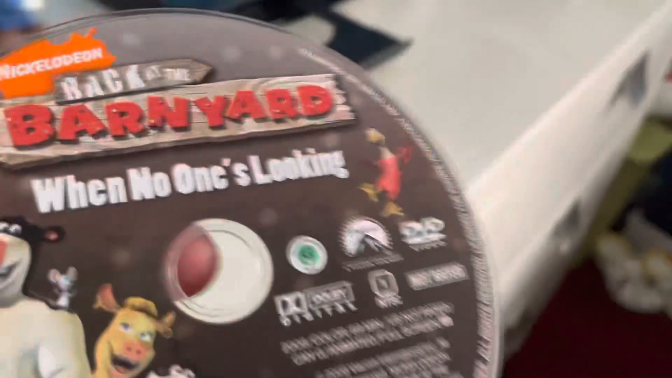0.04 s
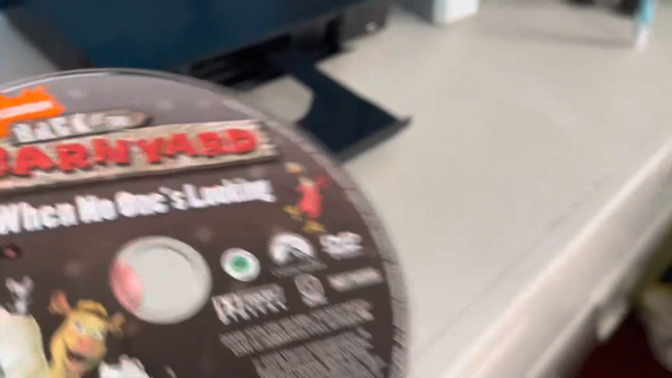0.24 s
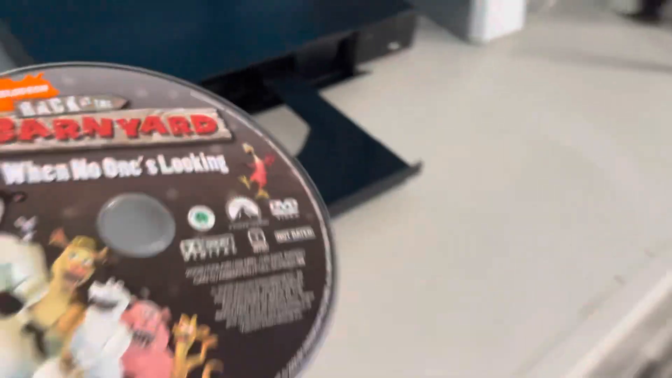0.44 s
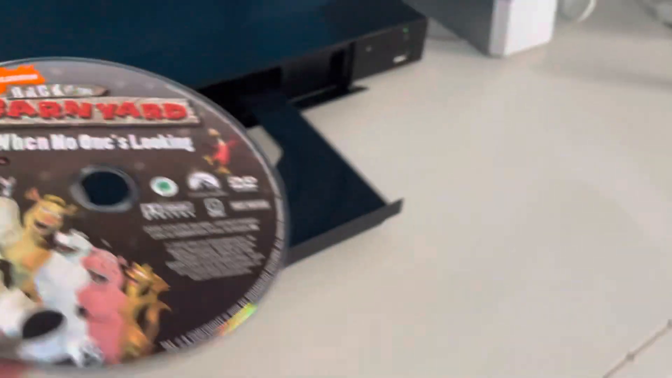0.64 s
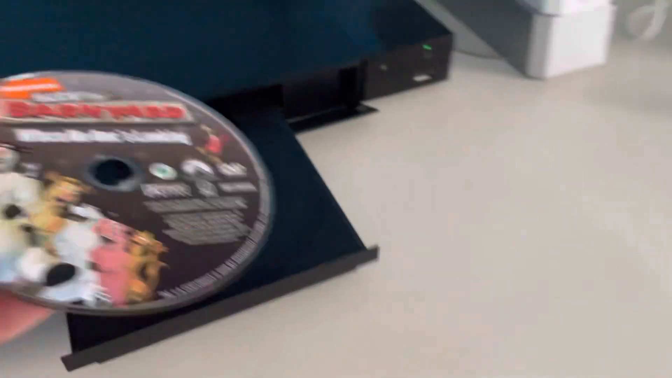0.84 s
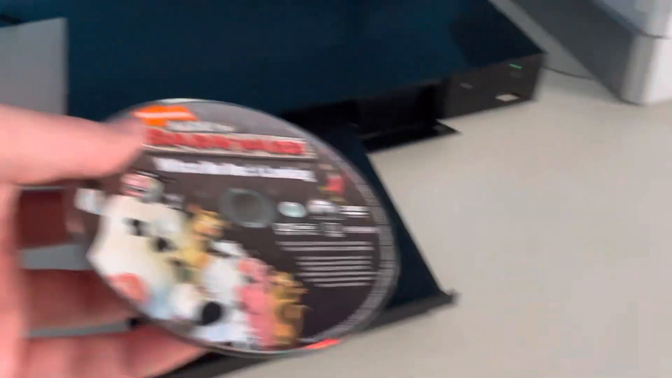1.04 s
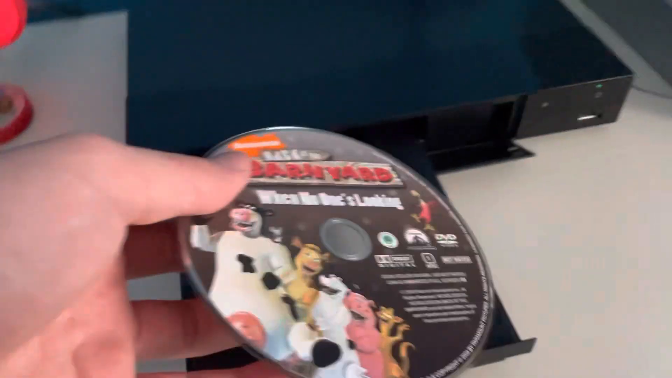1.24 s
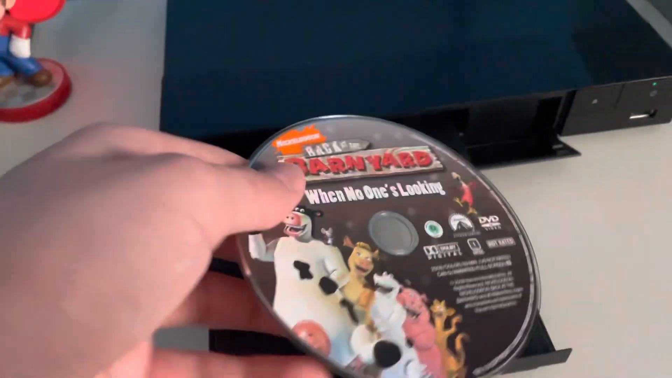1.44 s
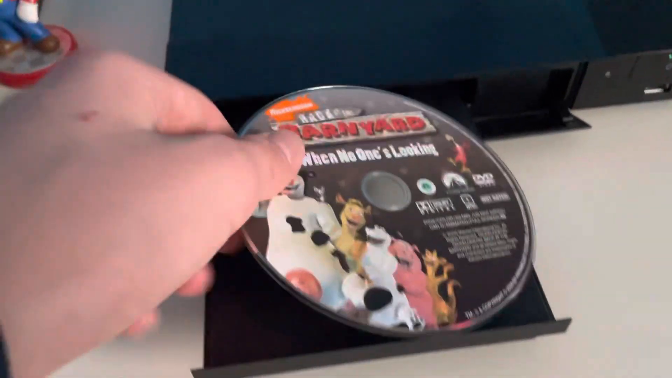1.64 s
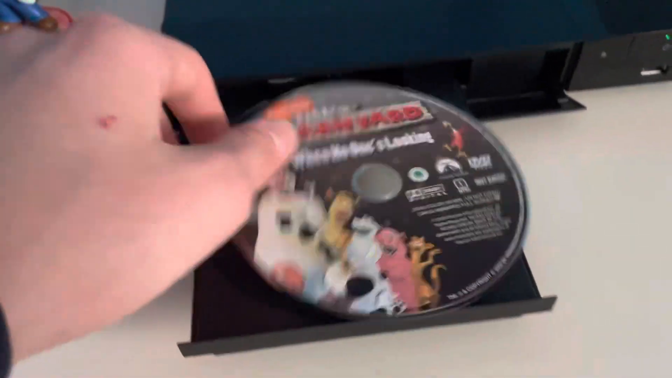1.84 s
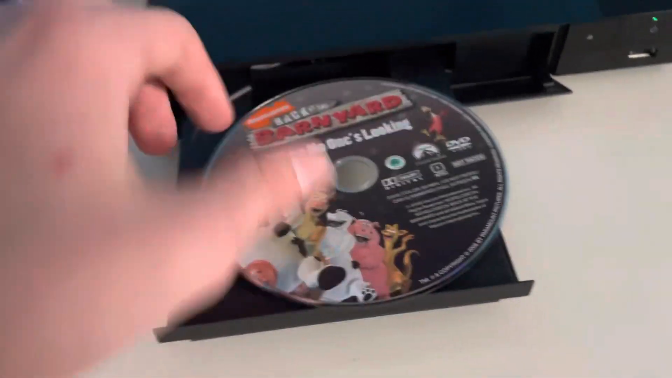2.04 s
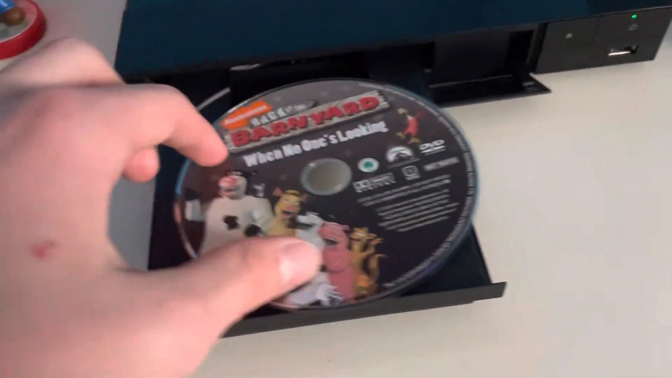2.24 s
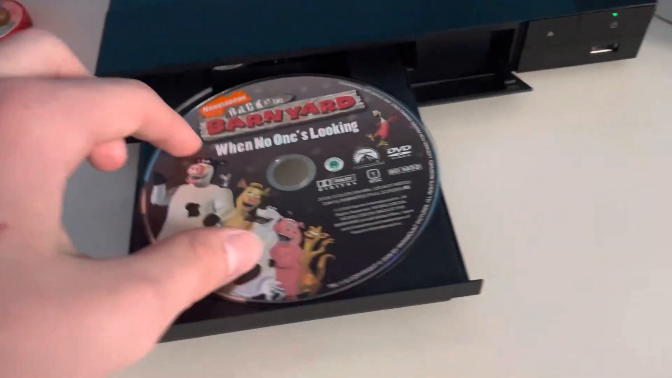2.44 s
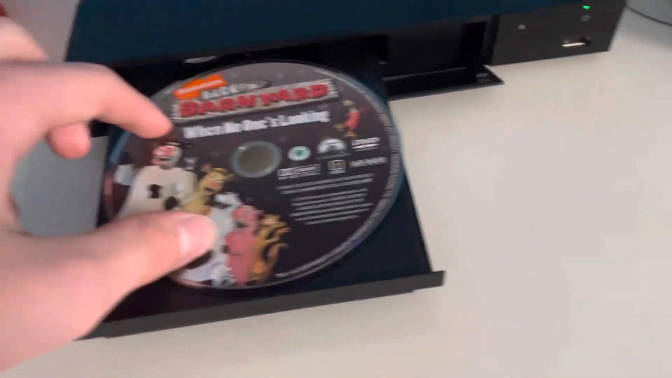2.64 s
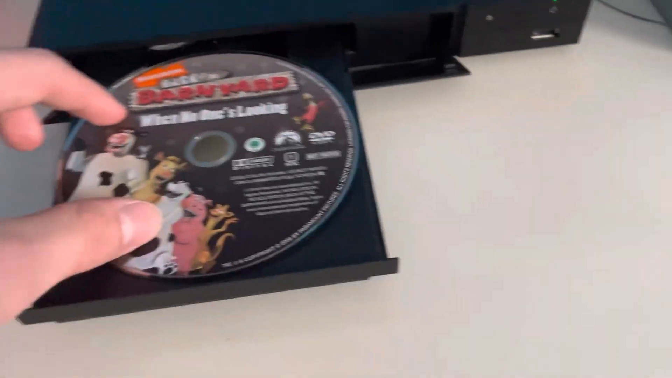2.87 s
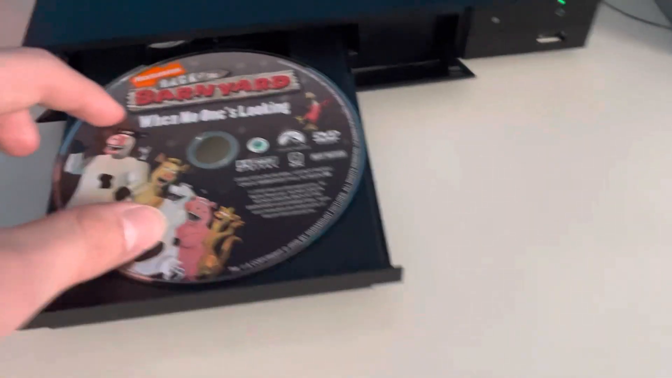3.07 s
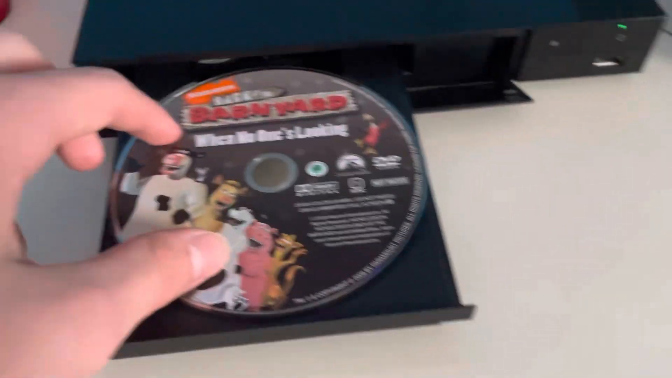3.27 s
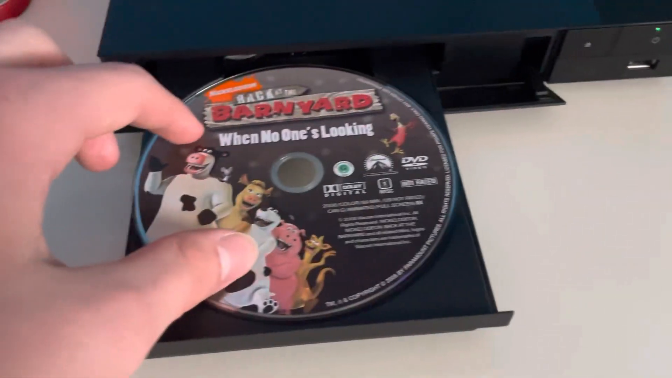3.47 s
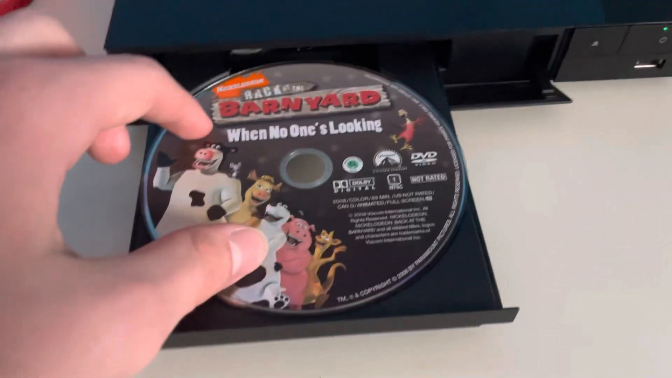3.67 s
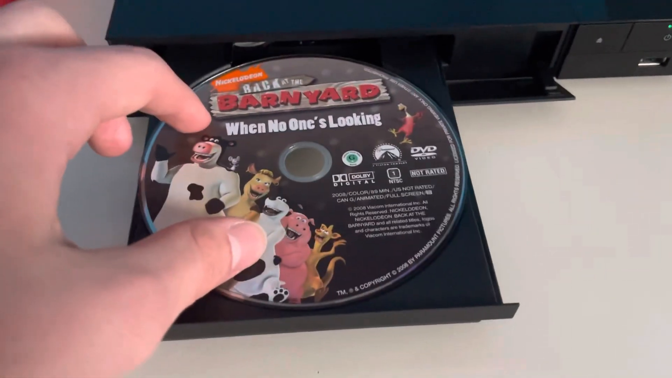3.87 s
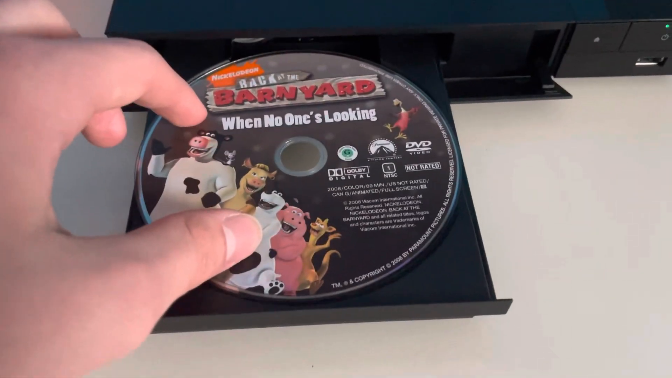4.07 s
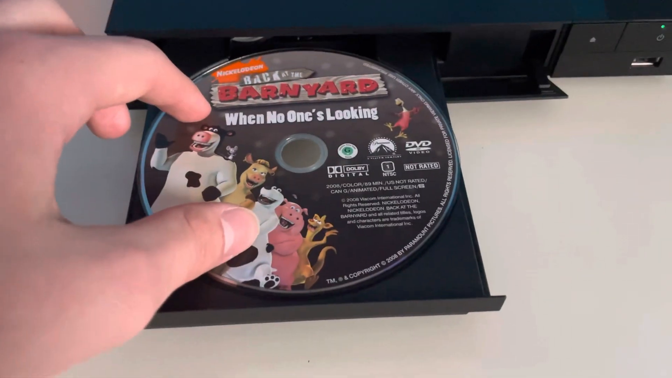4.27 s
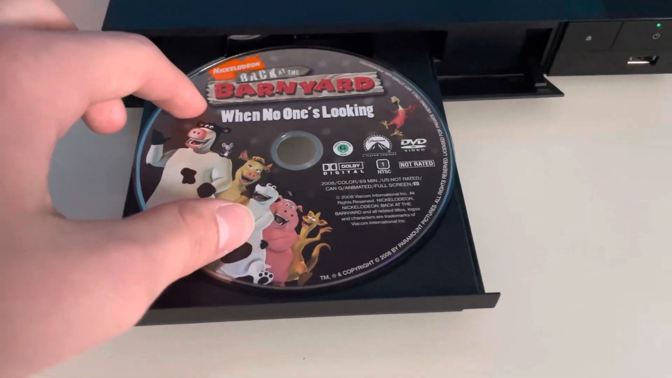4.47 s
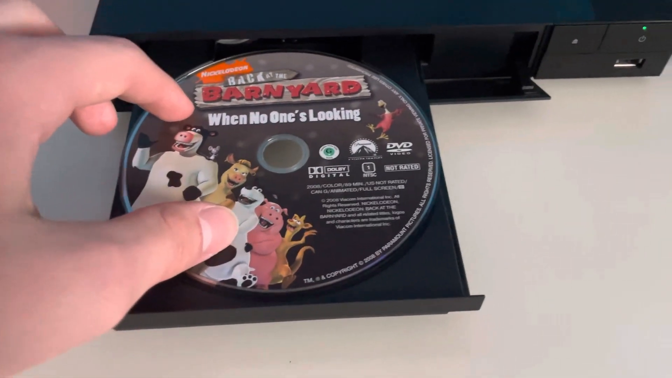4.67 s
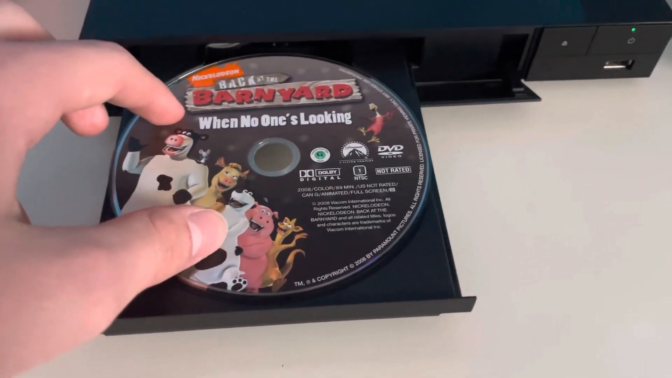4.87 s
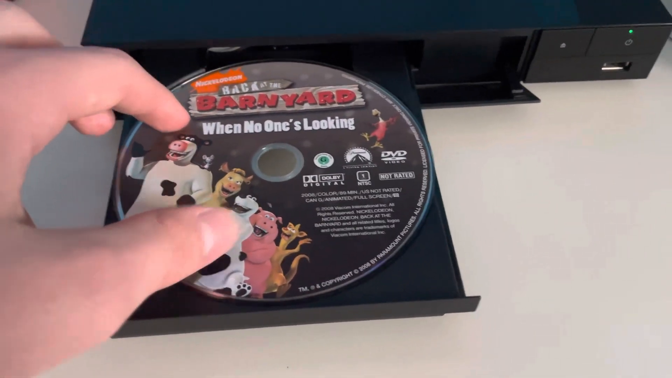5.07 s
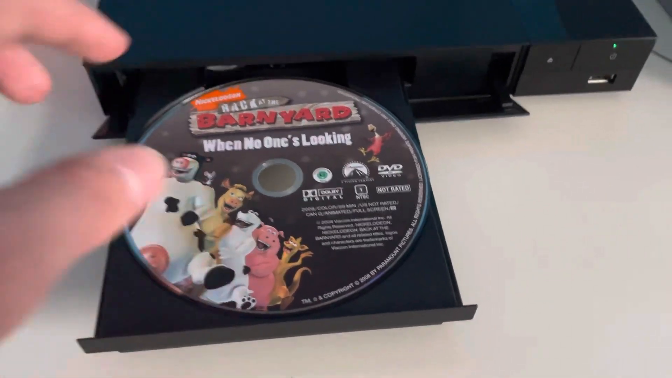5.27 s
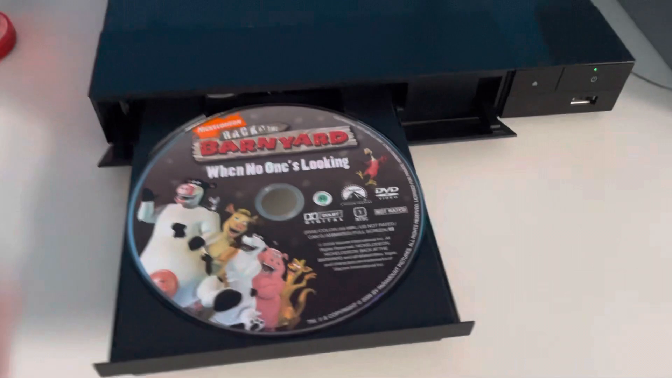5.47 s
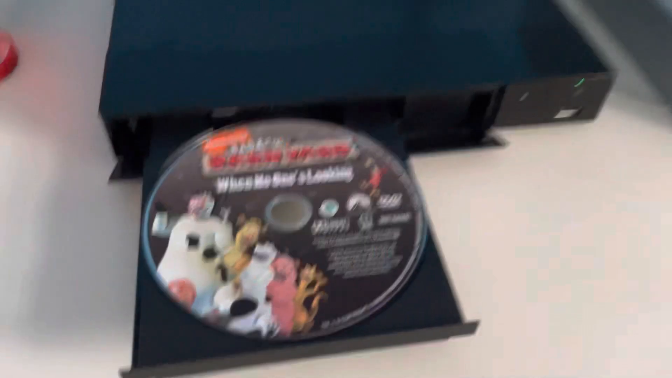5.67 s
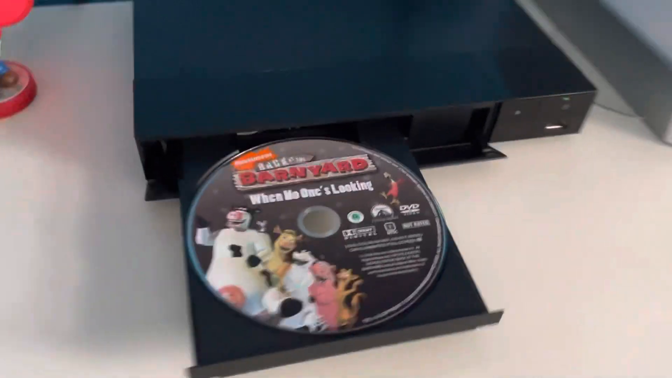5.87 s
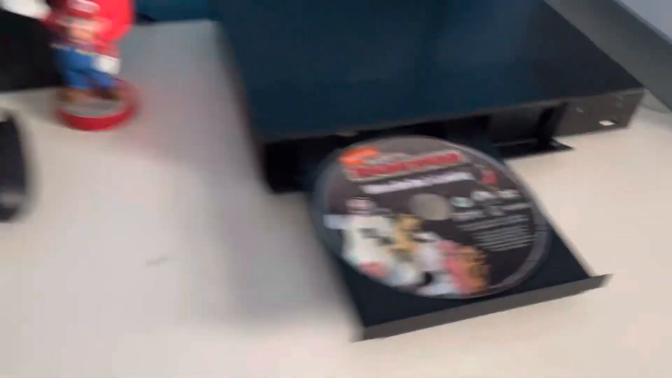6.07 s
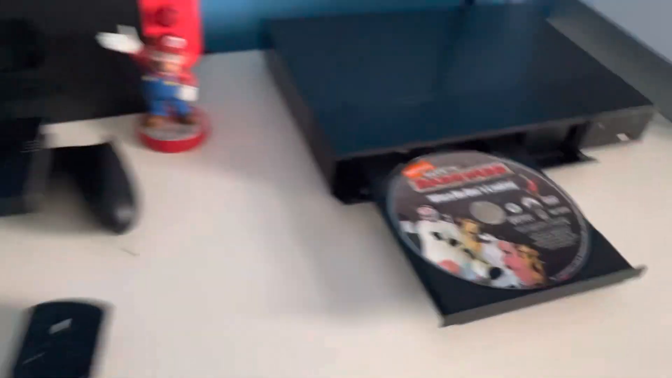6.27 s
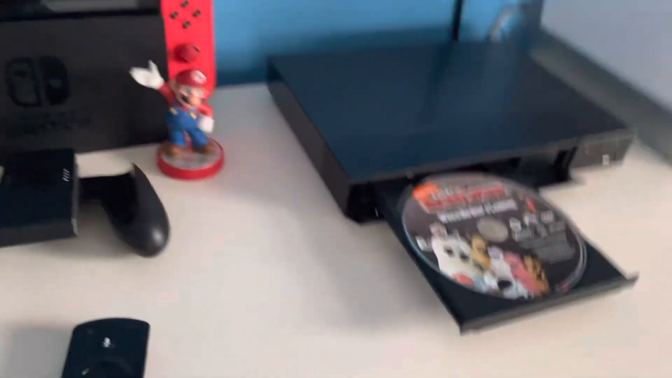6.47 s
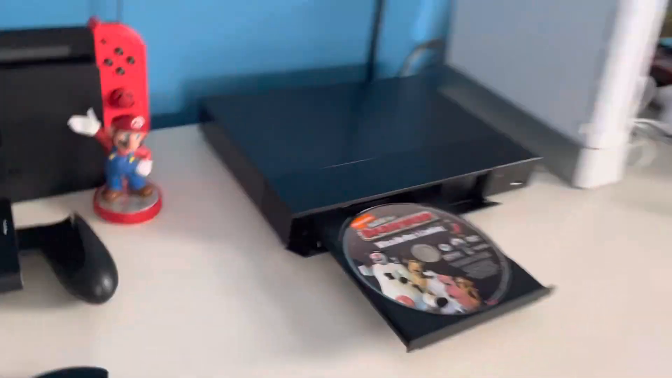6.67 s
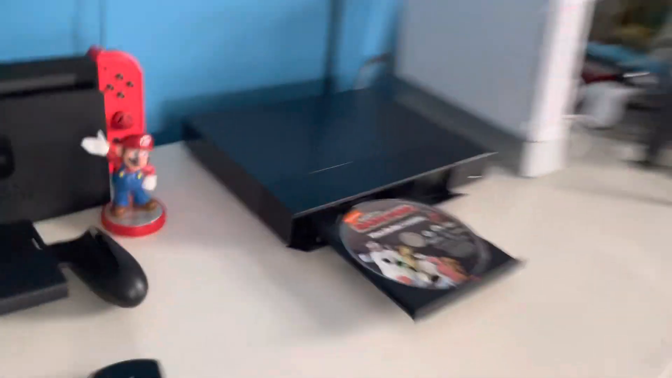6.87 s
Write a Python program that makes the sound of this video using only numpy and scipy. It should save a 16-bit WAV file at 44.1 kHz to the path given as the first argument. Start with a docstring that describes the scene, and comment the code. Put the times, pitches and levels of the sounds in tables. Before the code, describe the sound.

A hand-held stereo microphone listens up close in a quiet room with a steady low rumble. For the first second there are soft, dull knocks of hand and furniture and a faint sleeve rustle. From about 1.2 seconds a plastic disc taps and scrapes lightly against a player's open tray. At 1.8 seconds it drops in with a quick, bright rattle, the loudest event, which dies away just after 2 seconds. A sharp click follows at about 2.4 seconds, then faint scuffs, ticks and tiny plastic creaks until 3 seconds as fingers nudge it into its seat. It is then almost still, with one faint tap near 4.2 seconds and a few more around 5 as the fingers let go. From 5.5 seconds a body shifts, cloth rustles and soft knocks come as the microphone swings away, ending with a low, dull thump at 6.8 seconds.

```python
"""Laying a disc in a player's tray

A plastic disc taps and scrapes an open tray, drops with a rattle and is nudged into its seat. Impact and
friction excite its modes, which differ as it is held, lies loose or is pressed. Hand and furniture knock,
a sleeve rustles and a body shifts over the low rumble of a quiet room. A hand-held stereo microphone
hears it all and swings away near the end."""
import sys
import numpy as np
from scipy import signal
from scipy.fft import rfft, irfft, next_fast_len
from scipy.io import wavfile

SR = 44100
rng = np.random.default_rng(int(sys.argv[2]) if len(sys.argv) > 2 else 0)


def wrap_up_sound(samples):
    """Save the sound to the file named by the first command line argument, as 16-bit audio."""
    columns = np.atleast_2d(samples).T
    # keep every value between -1 and 1, then stretch to whole-number steps
    tamed = np.clip(columns, -1, 1)
    steps = np.round(tamed * 32767).astype(np.int16)
    wavfile.write(sys.argv[1], SR, steps)


N = 305076


def from_db(db):
    """Amplitude ratio of a level in decibels."""
    return 10 ** (np.asarray(db) / 20)


def rms_one(x):
    """Normalisation to unit rms."""
    return x / np.sqrt(np.mean(x ** 2) + 1e-20)


def at_hz(points, size, log=True):
    """Interpolation of a (frequency, value) table onto an FFT grid."""
    hz = np.arange(size // 2 + 1) * SR / size
    knots, values = np.transpose(points)
    return np.interp(np.log(hz + 1), np.log(knots + 1), values) if log else np.interp(hz, knots, values)


def coloured(x, spectrum):
    """Spectral shaping, at unit rms."""
    return rms_one(irfft(rfft(x) * from_db(at_hz(spectrum, N)), N))


def band(x, low_hz, high_hz):
    """Causal Butterworth band-pass."""
    return signal.sosfilt(signal.butter(2, [low_hz, high_hz], "band", fs=SR, output="sos"), x + 1e-18)


def steep_band(x, low_hz, high_hz):
    """Two band-passes in cascade double the slopes."""
    return band(band(x, low_hz, high_hz), low_hz, high_hz)


def drift(rate_hz):
    """Slow random fluctuation: low-passed noise of unit rms."""
    pole = np.exp(-80 * np.pi * rate_hz / SR)
    slow = signal.lfilter([1], [1, -2 * pole, pole * pole], rng.standard_normal(N // 40 + 2002))[2000:]
    return np.interp(np.arange(N) / 40, np.arange(len(slow)), rms_one(slow))


def resonate(x, hz, width_hz):
    """A damped two-pole resonator with unit peak gain."""
    r = np.exp(-np.pi * width_hz / SR)
    feedback = [1, -2 * r * np.cos(2 * np.pi * hz / SR), r * r]
    return signal.lfilter([(1 - r * r) / 2, 0, (r * r - 1) / 2], feedback, x + 1e-18)


def grains(per_s, spread_db):
    """Stick-slip friction as a Poisson train of uneven impulses, at unit rms."""
    sizes = from_db(spread_db * np.minimum(rng.exponential(1, N), 5)) * rng.choice([-1, 1], N)
    return rms_one(sizes * (rng.random(N) < per_s / SR))


def envelope(times, levels_db, t60s, rises, holds=0.):
    """Events rise, hold and decay exponentially; being incoherent, they add in power."""
    power, t = np.zeros(N + SR), np.arange(SR) / SR
    for start, db, t60, rise, hold in np.broadcast(times, levels_db, t60s, rises, holds):
        i, size = round(start * SR), int(min(rise + hold + 1.5 * t60, 1) * SR)
        fall_db = 60 * np.maximum(t[:size] - rise - hold, 0) / t60
        power[i:i + size] += (from_db(db - fall_db) * np.minimum(t[:size] / rise, 1)) ** 2
    return np.sqrt(power[:N])


def strokes(rows, t60):
    """Band envelopes of strokes: one at the main level, then one per relative level."""
    start, swell, hold, level_db, *parts_db = np.transpose(rows)
    return [envelope(start, level_db + db, t60, swell, hold) for db in [0] + parts_db]


# Taps of the disc's edge on the tray: (time [s], level [dB], bass, body, treble [dB re level])
DISC_TAPS = [(1.2392, -46.5, 8.5, 9, -32), (1.2668, -30, -5.5, -2.5, -20), (1.2757, -38, -25, 3, -14),
             (1.3248, -29.5, -19, -1, -11), (1.355, -50, -9, 5, -15), (1.3755, -45, -16, -3, -19),
             (1.429, -49, 5, -6, -28), (1.4915, -31, -28, -4, -25), (1.6865, -27.5, 1, -3.5, -17),
             (1.8088, -24.5, -17, -24, -38.5), (1.822, -21, -12.5, -9.5, -17.5),
             (1.831, -20.5, -9.5, -13.5, -17), (1.8375, -11.5, -28.5, -8.5, -7.5),
             (1.8424, -3, -21.5, -5, -14.5), (1.846, -19, -11.5, 6.5, -19.5),
             (1.8557, -26, -1.5, 13, -18.5), (1.866, -14.5, -5, 0, -10.5), (1.887, -18.5, -14, 1.5, -9),
             (1.8961, -21.5, -13, 2.5, -9.5), (1.9015, -14, -15, -6.5, -21), (1.908, -17, -12, -3, -16),
             (1.912, -24, -14, -4.5, -15.5), (1.9205, -20, -15.5, -8, -18.5), (1.926, -26, -13, -1.5, -16),
             (1.9399, -27, -12.5, -7, -22), (1.9522, -24, -28, 2, -35), (1.963, -31, 1, 0, -21),
             (1.9825, -26.5, -7, 1, -17.5), (1.99, -33, -5, 5, -18), (2.0095, -32, 3, 2, -16),
             (2.038, -39.5, -26, 1, -14.5), (2.0505, -47, 6, -10.5, -25.5), (2.196, -61, 8.5, 21, -23.5),
             (2.34, -44, -12.5, 10, -32), (2.3519, -16, -25, -4, -10), (2.3666, -18.5, -17, -11.5, -29),
             (2.64, -57, 21, 18, -20.5), (2.6582, -51.5, 9, 13, -9.5), (2.6677, -47, -2, -6.5, -22),
             (2.803, -50.5, -1.5, 5, -15), (2.817, -49.5, -12, -14, -11), (2.945, -74.5, 1.5, 0, -23.5),
             (3.03, -79, 3.5, 2, -21), (3.087, -71, 11.5, 14.5, -27), (4.1689, -50, 3, 4.5, -27),
             (4.4894, -66, 8.5, 10.5, -23), (5.026, -49, 4, 15.5, -16.5), (5.148, -73, 3, 21, -31),
             (5.1912, -63, -8.5, 8, -26.5), (5.211, -76.5, 10, 12, -27.5)]
# Spectra of rough contact and of a tap's first instant: (frequency [Hz], level [dB])
CONTACT_SPECTRUM = [(120, -4.5), (300, 6), (900, 4.5), (2000, 5), (4500, 1.5), (7000, -6.5), (8500, -1),
                    (10000, -7.5), (13000, -17.5), (14500, -18), (16000, -17.5)]
SNAP_SPECTRUM = [(1000, 4.5), (4500, 7.5), (7000, 1.5), (10000, -9), (14000, -14), (16000, -3.5)]
DROP_S, PRESS_S, LIFT_S = 1.82, 2.16, 4.9   # the fingers release the disc, settle on it, let go
HELD_T60_S, LOOSE_T60_S, PRESSED_T60_S = 0.032, 0.044, 0.056


def disc():
    """Impact and sliding friction radiate broadband noise and excite the modes of the disc."""
    time, level_db, bass_db, body_db, treble_db = np.transpose(DISC_TAPS)
    t60 = np.where(time < DROP_S, HELD_T60_S, np.where(time > PRESS_S, PRESSED_T60_S, LOOSE_T60_S))
    nudged = (time > PRESS_S) & (level_db < -36)   # weak taps under the fingers start softly
    rise = np.where(nudged, .003, .0002)
    slide, slide_body, slide_treble, slide_bass = sliding()
    rough = coloured(grains(per_s=12000, spread_db=0.51), CONTACT_SPECTRUM)
    snap = coloured(rng.standard_normal(N), SNAP_SPECTRUM)
    # The first instant of each tap.
    crack = snap * envelope(time, level_db - 6, .0035, rise)
    bright = snap * envelope(time, level_db + treble_db + 13, .0074, rise)
    # Envelopes of the tails: treble dies sooner, the tray's thud lasts longer.
    tail = envelope(time, level_db - 15.5, t60, rise) + from_db(-1.5) * slide
    treble = envelope(time, level_db + treble_db + 5.5, .8 * t60, rise) + from_db(11) * slide_treble
    body = envelope(time, level_db + body_db - 8, .98 * t60, rise) + from_db(-3) * slide_body
    bass = envelope(time, level_db + bass_db + .5, t60, rise) + from_db(2.5) * slide_bass
    ring = envelope(time, level_db - 6, .66 * t60, rise) + from_db(-2.5) * slide
    out = band(crack + rough * tail, 1800, 8700)
    out += band(bright + rough * treble, 6100, 15500)
    out += from_db(-3.5) * steep_band(rough * body, 750, 2100)
    out += from_db(-8) * band(rough * bass, 75, 700)
    return out + disc_modes(bass, body, ring)


# Scuffs on the tray: (start [s], swell [s], hold [s], level [dB], body, treble, bass [dB re level])
DISC_SLIDES = [(1.244, 0.0094, .5, -69.5, 10.7, -11, 17), (1.37, 0.0098, 0.06, -61, 11.6, -12, 15.4),
               (1.53, 0.046, 0.0091, -59, 9.9, -11, 14), (1.645, 0.014, 0.092, -65, 11.2, -9.5, 13),
               (1.764, 0.0089, 0.1, -51, 7.8, -14, 9.7), (1.84, 0.027, 0.079, -38, 7.1, -8, 5.3),
               (1.97, 0.01, 0.09, -61, 13, -16, 10), (2.179, 0.019, 0.012, -72, 13.6, -17, 25),
               (2.243, 0.045, 0.07, -59, 5.8, -14.5, 8.8), (2.354, 0.0061, 0.025, -50, 8.3, -7, 12),
               (2.411, .01, 0.049, -63.5, 6.8, -22, 14), (2.6, 0.058, 0.025, -65.5, 7.6, -13.5, 17),
               (2.76, 0.039, 0.048, -70, 11.9, -12, 15.4), (2.86, 0.019, 0.035, -86, 5.4, -16, 18.4),
               (3.0, 0.016, 0.015, -78, 5.6, -16.5, 21), (3.35, .04, 0.018, -83.5, 12.6, -14.5, 10),
               (3.55, 0.0096, 0.025, -77, 8.8, -19.5, 15.6), (4.13, 0.03, 0.022, -74, 11.3, -11.5, 14.5),
               (4.93, 0.017, 0.011, -83, 10, -12.5, 11), (5.001, 0.019, 0.01, -63, 13.3, -10.5, 10.2),
               (5.025, 0.003, 0.025, -84, 39.4, -17, 40), (5.05, 0.0097, 0.036, -79.5, 20, -20, 25),
               (5.19, 0.01, .025, -85.5, 13.2, -15.5, 21.6)]


def sliding():
    """Band envelopes of sliding friction, which fluctuates as the edge catches unevenly."""
    start = np.array(DISC_SLIDES)[:, 0]
    t60 = np.where(start < PRESS_S, .12, np.where(start < LIFT_S, .23, .09))
    catch = from_db(1.2 * drift(35))
    return catch * np.array(strokes(DISC_SLIDES, t60))


# Modes of the disc held by its rim, loose in the tray and damped under the fingers:
# (frequency [Hz], bandwidth [Hz], relative gain [dB])
HELD_MODES = [(166.6, 8.1, -3), (373, 20, -1.5), (453.5, 21, -11), (945, 40, -1), (1180, 60, -10.5),
              (1360, 60, -6.5), (1630, 40, -18), (1970, 57, -7.5), (2560, 46, -5), (2950, 160, -13),
              (3741, 98, -14), (4100, 110, -14.5), (4460, 140, -9), (5660, 81, -14.5)]
LOOSE_MODES = [(118, 38, -3), (462, 24, -1.5), (198, 39, -1.5), (942, 34, 0), (1170, 69.66, -3),
               (1400, 62, -2.5), (1610, 60, -8.5), (1907, 50, -7.5), (2062, 89, -6), (2255, 40, -8.5),
               (2540, 37, -8.5), (3200, 83, -5), (3670, 160, -14.5), (4480, 140, -7), (4781, 88, -9),
               (5340, 120, -10.5), (5750, 120, -10), (6800, 640, -10.5)]
PRESSED_MODES = [(230, 115, -5.5), (500, 76, -1.5), (746, 440, -4), (1150, 180, 3.5), (1412.5, 77, 4.5),
                 (1595, 59, -3), (2205.5, 1300, -11), (3102, 110, -4), (3610, 67, -7.5), (4157, 47, -15),
                 (4636, 140, -6), (5440, 300, -6), (5800, 64, -12.5)]
LOSS_FACTOR = .014   # least bandwidth over frequency: plastic damps high modes most


def disc_modes(bass, body, ring):
    """Forced vibration of a plate: each boundary condition has its own set of modes."""
    rub, t = grains(per_s=5000, spread_db=2.2), np.arange(N) / SR
    held, pressed = t < DROP_S, t > PRESS_S
    out = np.zeros(N)
    for modes, state, gain_db, wander_db in ((HELD_MODES, held, 18, 3.0),
                                             (LOOSE_MODES, ~held & ~pressed, 12, 3.2),
                                             (PRESSED_MODES, pressed, 10, 1.5)):
        span = slice(np.argmax(state), N - np.argmax(state[::-1]) + SR // 2)   # includes the ring-out
        for k, (hz, width, db) in enumerate(modes):
            drive = bass if hz < 700 else body if hz < 2200 else ring
            force = state * rub * drive * from_db(wander_db * drift(28))
            mode = resonate(force[span], hz, max(width, LOSS_FACTOR * hz))
            out[span] += from_db(db + gain_db) * (-1) ** k * mode
    return out


# Soft knocks of hand and furniture: (time [s], level [dB], frequency [Hz], click [dB re level])
SOFT_KNOCKS = [(0.156, -48, 615, -5), (.168, -54, 600, -3), (.2425, -50, 620, 0), (0.267, -53, 806, 1),
               (.293, -60, 600, -10), (.311, -64, 617, -6), (0.337, -49, 600, -11), (.35, -56, 590, -12),
               (.376, -48.5, 560, -10), (.401, -59, 480, -8), (.575, -56, 470, 3), (0.594, -43.5, 432, 4.5),
               (1.071, -35.5, 606, -19), (1.078, -36, 330, -33), (4.953, -48, 413, -6),
               (5.063, -45, 390, -21), (5.631, -61.5, 1340, -7), (5.730, -56, 1483, -5),
               (5.82, -58, 700, -4), (5.861, -38.5, 612, -11.5), (5.912, -50, 630, -11),
               (5.947, -48.5, 570, -10), (5.998, -46.5, 1053, -6.5), (6.004, -49.5, 1100, 3),
               (6.040, -46.5, 785, -11), (6.118, -55.5, 603, 0), (6.314, -39, 300, -14),
               (6.359, -65, 950, 7), (6.387, -45.5, 400, -17), (6.801, -48.5, 417, -14),
               (6.811, -29.5, 136, -18)]
KNOCK_RISE_S, KNOCK_T60_S, KNOCK_CYCLES = .0025, 0.013, 7.3   # decay takes this time plus these cycles


def knocks():
    """Damped free vibration: each impact gives a dull click and a ring that sags in pitch at its onset."""
    time, level_db, pitch, click_db = np.transpose(SOFT_KNOCKS)
    clicks = rng.standard_normal(N) * envelope(time, level_db + click_db, t60s=.012, rises=.00045)
    out = band(band(clicks, 540, 2100), 470, 2800)
    t = np.arange(SR // 5) / SR
    for start, db, hz in zip(time, level_db, pitch):
        t60 = KNOCK_T60_S + KNOCK_CYCLES / hz
        cycles = np.cumsum(hz * (1 + 0.74 * np.exp(-t / 0.00084))) / SR
        ring = from_db(db - 60 * t / t60) * np.minimum(t / KNOCK_RISE_S, 1) * np.sin(2 * np.pi * cycles)
        i = round(start * SR)
        out[i:i + len(t)] += ring[:N - i]
    return out


# Small creaks and rubs of plastic: (start [s], swell [s], hold [s], level [dB], frequency [Hz])
PLASTIC_CREAKS = [(1.546, 0.013, 0.035, -71, 5430), (1.649, 0.011, 0.013, -62.5, 4100),
                  (2.506, 0.011, .03, -87.5, 3720), (2.595, 0.015, 0.029, -78.5, 3780),
                  (2.649, .006, 0.0098, -60, 4010), (2.66, .004, 0.0073, -66, 4630),
                  (2.76, .02, 0.027, -79.5, 3500), (2.794, .004, 0.013, -75, 5630),
                  (2.807, .004, 0.009, -68, 4700), (2.861, 0.009, 0.021, -90, 5720),
                  (2.865, .01, 0.024, -95, 4660), (2.933, .005, 0.007, -85, 3620),
                  (2.932, .005, .008, -88, 4800), (3.001, 0.016, 0.018, -83.5, 4670),
                  (3.009, 0.0071, 0.014, -86.5, 5500), (2.998, .015, 0.021, -85, 3580),
                  (3.075, .006, 0.01, -87, 4550), (5.87, .005, 0.037, -79.5, 2626),
                  (5.9, 0.0067, 0.053, -83.5, 3155), (3.019, 0.0073, .015, -77, 1540),
                  (3.568, 0.0077, .02, -76.5, 1493), (5.01, 0.0065, 0.012, -68.5, 3700),
                  (6.057, 0.013, 0.024, -66.5, 2190), (6.059, 0.012, 0.023, -82, 3970)]


def creaks():
    """Stick-slip impulses excite one rough resonance per creak."""
    out, slips = np.zeros(N), grains(per_s=4000, spread_db=2.3)
    for start, swell, hold, level_db, hz in PLASTIC_CREAKS:
        span = slice(round(start * SR), round(start * SR) + SR // 4)
        ring = resonate(resonate(slips[span], hz, width_hz=300), hz, width_hz=600)
        out[span] += envelope(start, level_db, .05, swell, hold)[span] * rms_one(ring)
    return out


# Rubs of sleeve and skin: (start [s], swell [s], hold [s], level [dB], upper, treble, air [dB re level])
SLEEVE_RUBS = [(0, 0.0011, 0.0066, -63.5, -4, -6, -12), (0.089, 0.0037, 0.039, -73.5, -2.5, -6, -5.5),
               (0.152, 0.0034, 0.018, -60, -12, -23, -37), (.21, 0.014, .33, -71, -6.5, -22, -25),
               (.6, 0.0068, 0.044, -72, -1.5, -16, -20), (0.664, 0.0032, 0.0092, -70, 0, -1.5, -3.5),
               (.76, 0.0086, 0.074, -76.5, -7, -28, -30), (0.891, 0.0075, 0.013, -92.5, -14, 11, 9),
               (1.071, 0.0054, 0.029, -67, -12, -22, -25), (5.55, 0.045, 0.25, -75, -8, -19, -15),
               (5.858, 0.0052, 0.11, -71.5, -6, -15.5, -20.5), (5.976, 0.024, 0.058, -68, -0.5, -15, -20),
               (6.05, 0.018, 0.045, -70.5, -1.5, -18, -17), (6.314, 0.027, 0.076, -64, -8, -10, -14.5),
               (6.45, 0.021, 0.042, -70.5, -9.5, -11.5, -13), (6.6, 0.042, 0.21, -76, -15, -17, -19),
               (6.775, 0.023, 0.009, -66.5, -4, -10.5, -20.5),
               (6.797, 0.0042, 0.029, -59, -5.5, -6.5, -18.5), (6.85, 0.0066, .07, -68, -6, -9, -27)]
# Spectrum of rubbing cloth: (frequency [Hz], level [dB])
CLOTH_SPECTRUM = [(200, 31.5), (500, 23), (1200, 16), (2500, -2.5), (3400, -7.5), (4500, -9.5),
                  (7000, -15.5), (11000, -31), (14000, -21), (16000, -28)]
RUSTLE_BANDS_HZ = (350, 1420), (1500, 2720), (2750, 7660), (8000, 13000)


def rustle():
    """Friction of cloth and skin: dense small slips merge into uneven patches of noise."""
    cloth = coloured(grains(per_s=5000, spread_db=1.8), CLOTH_SPECTRUM) * from_db(1.5 * drift(25))
    parts = [rms_one(steep_band(cloth, *edges)) for edges in RUSTLE_BANDS_HZ]
    return sum(level * part for level, part in zip(strokes(SLEEVE_RUBS, t60=0.29), parts))


# Faint squeaks: (start [s], swell [s], hold [s], level [dB])
FAINT_SQUEAKS = [(5.565, .015, .075, -84), (5.68, .01, 0.068, -87)]
SQUEAK_HZ, SQUEAK_WAVER_HZ = 2220, 28


def squeak():
    """Random amplitude and frequency modulation make a thin tone waver."""
    level, = strokes(FAINT_SQUEAKS, t60=0.051)
    flicker = from_db(1.9 * drift(40))
    hz = SQUEAK_HZ + SQUEAK_WAVER_HZ * drift(25)
    return level * flicker * rms_one(np.sin(2 * np.pi * np.cumsum(hz) / SR))


# Movements of the body: (start [s], swell [s], hold [s], level [dB], upper, deep [dB re level])
BODY_SHIFTS = [(0.0, 0.014, 0.29, -65.5, -1.5, 19), (.32, 0.026, 0.052, -58, -6.5, -18),
               (.6, 0.031, 0.043, -56, -5.5, 8), (1.06, 0.028, 0.048, -57.5, -4, 8),
               (1.2, 0.024, 0.74, -57, -34, -1), (1.8, 0.053, 0.082, -38.5, -20, -10.5),
               (2.2, 0.037, 0.067, -52.5, -12.5, 9), (2.355, 0.0071, 0.012, -50.5, -1, 12),
               (2.62, 0.064, 0.086, -65.5, -8, 18.5), (2.8, 0.031, 0.091, -55.5, -8.5, 2),
               (5.53, 0.038, 0.078, -43.5, -7, -6.5), (5.86, 0.015, 0.018, -55, -1, 3.5),
               (6.28, 0.05, 0.075, -58.5, -2.5, 13), (6.62, 0.036, 0.083, -66, -11, -4.5),
               (6.79, 0.025, 0.032, -43.5, -11.5, 6)]
SHIFT_BANDS_HZ = (91, 195), (187, 390), (35.73, 81)


def shifting():
    """A shifting body makes swells of low noise, only partly coherent between the channels."""
    main, upper, deep = strokes(BODY_SHIFTS, t60=0.51)
    white = rng.standard_normal((2, N))
    noise = [rms_one(steep_band(white, *edges)) for edges in SHIFT_BANDS_HZ]
    mid, side = (main * noise[0] * [[1.2], [.5]]
                 + upper * noise[1] * [[1.3], [.3]]
                 + deep * noise[2] * [[1.05], [.9]])
    return from_db(-3) * np.array([mid + side, mid - side])


# Mid and side spectra of the room's noise: (frequency [Hz], relative spectral density [dB])
ROOM_MID_SPECTRUM = [(12, -18), (30, -2), (45, 0), (75, 2), (100, -9.5), (200, -18.5), (340, -23),
                     (600, -32), (1000, -41.5), (2000, -52), (5000, -58.5), (7200, -63), (8100, -81),
                     (9200, -63), (13000, -65.5), (14500, -79.5)]
ROOM_SIDE_SPECTRUM = [(12, -19), (30, -3.5), (62, -1), (100, -9), (200, -22.5), (340, -28.5), (600, -34),
                      (1000, -41), (2000, -53), (6000, -62), (9500, -61), (11500, -74), (14500, -73.5)]
ROOM_MID_DB, ROOM_SIDE_DB = -51, -54
HUM_HZ, HUM_DB = 29.9, -58.5


def room_tone():
    """Ambient noise: gently swelling rumble and hiss, and a hum that reaches the ports out of phase."""
    mid = from_db(ROOM_MID_DB + 0.68 * drift(4.5)) * coloured(rng.standard_normal(N), ROOM_MID_SPECTRUM)
    side = from_db(ROOM_SIDE_DB + 0.51 * drift(0.99))
    side *= coloured(rng.standard_normal(N), ROOM_SIDE_SPECTRUM)
    phase = 2 * np.pi * HUM_HZ * np.arange(N) / SR + np.array([[0], [1.4]])
    hum = from_db(HUM_DB + 1.102 * drift(3.2)) * np.sqrt(2) * np.sin(phase)
    return np.array([mid + side, mid - side]) + hum


def reverb(x, level_db=-13, decay_s=0.036, dull_hz=5400):
    """Diffuse field: convolution with a short, dull noise tail, independent in each channel."""
    t = np.arange(SR // 2) / SR
    tail = rng.standard_normal((2, len(t))) * from_db(-60 * t / decay_s) * np.minimum(t / 0.072, 1)
    tail = band(tail, 100, dull_hz)
    tail /= np.sqrt(np.sum(tail ** 2) / 2)
    return from_db(level_db) * signal.fftconvolve(x[None], tail, axes=1)[:, :N]


# Phase lead of the left port, and the lead added by the swing: (frequency [Hz], phase [rad])
LEFT_LEAD = [(0, 0), (1640, -0.3), (2670, 1.3), (3190, 0.2), (4130, -0.3), (4910, 0.7), (5340, 0.3),
             (6200, -0.3), (7670, -2.8), (9390, -3.9), (10500, -5.9), (13000, -6.7), (13800, -9.2),
             (15500, -9.5)]
OFF_AXIS_LEAD = [(0, 0), (300, .5), (800, 1.5), (1700, 1.6), (2600, 0), (16000, 0)]
# Level difference between the ports: (frequency [Hz], left minus right [dB])
LEFT_EXCESS = [(60, 0), (250, 2), (500, 2), (800, 5.5), (1200, 4), (1700, 2), (2400, 7), (3500, 5),
               (4700, 4.5), (6300, 3), (8000, 0), (15000, -1)]
# Off its axis the microphone hears less treble: (frequency [Hz], gain [dB])
OFF_AXIS_GAIN = [(1800, 0.5), (3300, 2.5), (4300, -4), (7000, -3), (12000, 0)]
TURN_S = 6.25   # the microphone swings away and hears the handling from the side


def ports(x, turned=False):
    """Directional reception: each microphone port hears a near source with its own level and phase."""
    size = next_fast_len(len(x) + 1024)
    phase = at_hz(LEFT_LEAD, size, log=False) + turned * at_hz(OFF_AXIS_LEAD, size, log=False)
    left = from_db(at_hz(LEFT_EXCESS, size) / 2) * np.exp(.5j * phase)
    spectrum = rfft(x, size) * from_db(turned * at_hz(OFF_AXIS_GAIN, size))
    return irfft(spectrum * np.array([left, 1 / left]), size)[:, :len(x)]


def scene():
    """Superposition of the near sources' direct and diffuse sound, body rumble and room tone."""
    near = disc() + knocks() + rustle() + squeak() + creaks()
    turn = round(TURN_S * SR)
    direct = np.hstack([ports(near[:turn]), ports(near[turn:], turned=True)])
    return direct + reverb(near) + shifting() + room_tone()


CUTOFF_HZ = 15900


def record(dry):
    """Band limiting: an elliptic low-pass cuts the top steeply."""
    return signal.sosfilt(signal.ellip(10, .5, 70, CUTOFF_HZ, fs=SR, output="sos"), dry)


dry = scene()
out = record(dry)
wrap_up_sound(out)
```